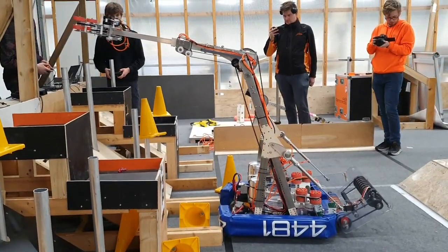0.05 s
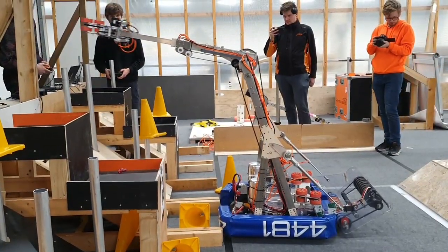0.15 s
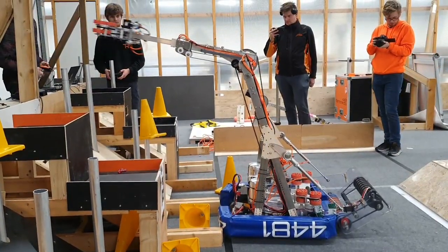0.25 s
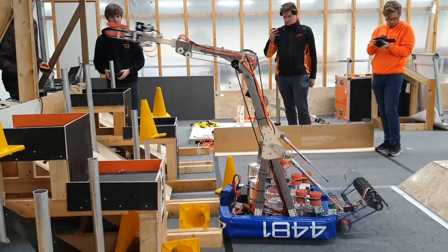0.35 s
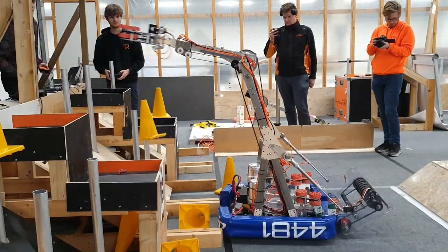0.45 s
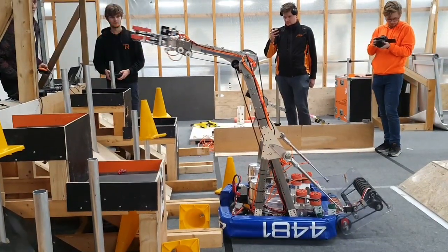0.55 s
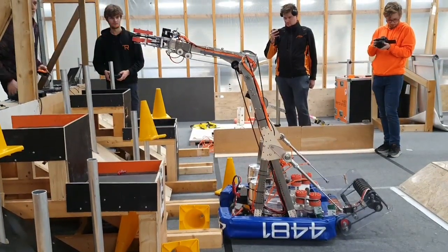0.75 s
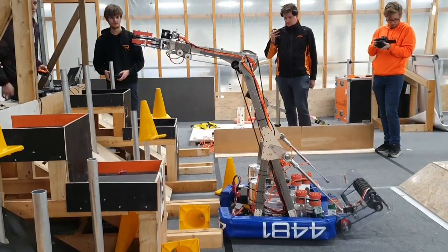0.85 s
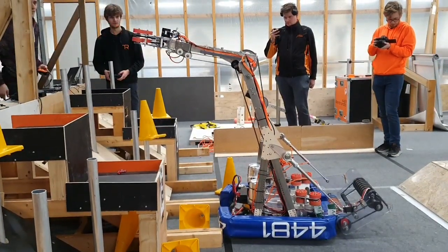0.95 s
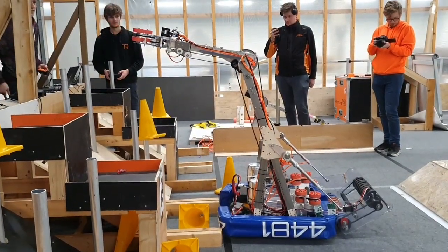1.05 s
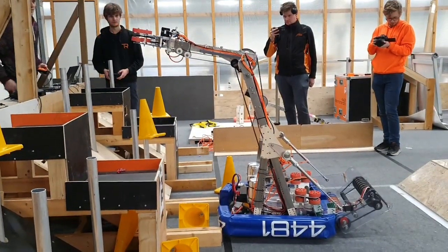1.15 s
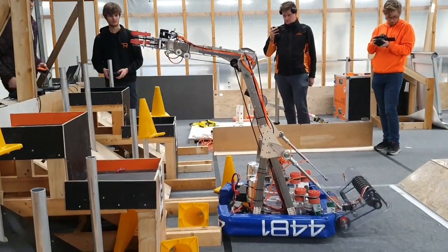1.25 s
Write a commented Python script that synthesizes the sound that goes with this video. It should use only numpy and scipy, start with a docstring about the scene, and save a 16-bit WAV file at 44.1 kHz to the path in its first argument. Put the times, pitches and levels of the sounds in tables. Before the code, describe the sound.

Faint clicks, then a robot arm whirs up, grinding and buzzing for half a second; it hits its stop with a loud clank and thump, rattles a little and rings out in a quiet workshop.

```python
"""Robot arm hitting its stop

A robot arm retracts in a workshop: gear meshing whines, random tooth clashes rattle, the frame drones.
At the end stop, bursts of decaying coloured noise make the clunk and the clicks of loose parts.
Decaying sine modes thump the chassis and ring the metal tubes, and low noise booms after them.
Noise tails convolved with the motor and the hits form the hall, over a low steady background.
"""
import sys
import numpy as np
from scipy import signal
from scipy.fft import rfft, irfft, next_fast_len
from scipy.io import wavfile
from scipy.ndimage import map_coordinates

SR = 44100
rng = np.random.default_rng(int(sys.argv[2]) if len(sys.argv) > 2 else 0)


def store_wav(level_fs):
    """Save 16-bit WAV to argv[1]."""
    pcm = np.round(np.clip(np.atleast_2d(level_fs), -1, 1) * 32767)
    wavfile.write(sys.argv[1], SR, pcm.T.astype(np.int16))


N = 57330


def amp(db):
    """Decibel law: the amplitude gain of a level in dB."""
    return 10 ** (np.asarray(db) / 20)


def unit(x):
    """Normalisation: x scaled to an rms of 1."""
    return x / np.sqrt(np.mean(x ** 2) + 1e-20)


def clock():
    """Sampling: the time of each sample in seconds."""
    return np.arange(N) / SR


def along(points, hz):
    """Interpolation of (Hz, value) points on a logarithmic frequency axis."""
    point_hz, value = np.transpose(points)
    return np.interp(np.log(hz + 1), np.log(point_hz + 1), value)


def curves(rows):
    """Linear interpolation in time: one curve for each column after the seconds."""
    seconds, *columns = np.transpose(rows)
    return [np.interp(clock(), seconds, column) for column in columns]


def wobble(rate):
    """Band-limited fluctuation: a spline through random knots, rate of them a second."""
    return map_coordinates(rng.standard_normal(N), [clock() * rate])


def phase(hz):
    """Phase in radians as the running integral of a frequency."""
    return 2 * np.pi * np.cumsum(hz) / SR


def filtered(x, response):
    """Linear filtering: the spectrum of x times a response of frequency."""
    size = next_fast_len(N + SR // 2)
    spectrum = rfft(x, size) * response(np.fft.rfftfreq(size, 1 / SR))
    return irfft(spectrum, size)[..., :N]


def coloured(x, colour):
    """Spectral shaping: x filtered through (Hz, dB) points, then set to an rms of 1."""
    return unit(filtered(x, lambda hz: amp(along(colour, hz))))


# Likeness of the two sides. Each row: frequency in Hz, left-right correlation from 0 to 1.
LIKENESS = [(100, 0.96), (250, .94), (550, 0.86), (1000, 0.31), (2500, 0.12), (5000, 0.11), (15000, 0.074)]


def stereo_noise():
    """Interaural coherence: white noise, alike on both sides in the bass and less so in the treble."""
    def mid_side_gains(hz):
        angle = np.arccos(np.clip(along(LIKENESS, hz), 0, 1)) / 2
        return np.array([np.cos(angle), np.sin(angle)])

    mid, side = filtered(rng.standard_normal((2, N)), mid_side_gains)
    return np.array([mid + side, mid - side])


def struck(start_s, t60, attack_s):
    """Damped response: a fast rise at start_s, then an exponential fall of 60 dB in t60 seconds."""
    age = np.maximum(clock() - start_s, 0)
    return (1 - np.exp(-age / attack_s)) * np.exp(-np.log(1000) * age / t60)


def with_echoes(x, response, echo_db):
    """Superposition: direct sound plus its convolution with a response, at a near-constant power."""
    echoes = signal.fftconvolve(np.atleast_2d(x), response / np.linalg.norm(response[0]), axes=1)[:, :N]
    return (x + amp(echo_db) * echoes) / np.hypot(1, amp(echo_db))


# Background spectrum. Each row: frequency in Hz, relative level in dB.
BACKGROUND = [(15, -55), (25, -23.5), (167, -15), (196, -19.5), (243, -11), (271, -21.5), (515, -23.5),
              (978, -33.5), (1240, -26), (2240, -29), (2560, -28.5), (2780, -32.5), (15000, -73.5)]
BACKGROUND_DB = -53.5  # rms level


def background():
    """Stationary noise: random sound with a fixed, mostly low spectrum."""
    return amp(BACKGROUND_DB) * coloured(stereo_noise(), BACKGROUND)


# Reverberation of the hall. Each row: frequency in Hz, t60 in seconds.
HALL = [(100, 0.6), (500, 0.83), (2000, 0.81), (4000, 0.58), (8000, 0.38), (15000, 0.26)]
MOTOR_WET_DB, HIT_WET_DB = -4.5, -7.5  # tail gain against the direct sound


def hall(x, wet_db):
    """Reverberation: a noise tail in which each frequency decays at its own speed."""
    hz, t, spectrum = signal.stft(stereo_noise(), SR, nperseg=256)
    decay = np.exp(-np.log(1000) * t / along(HALL, hz)[:, None])
    tail = signal.istft(spectrum * decay, SR, nperseg=256)[1][:, :N]
    return with_echoes(x, tail, wet_db)


EARLY_T60 = 0.058  # seconds


def scattered(x, echo_db):
    """Early reflection: a mono source heard directly and off the nearby floor and benches."""
    return with_echoes(x, stereo_noise() * struck(0, EARLY_T60, 0.0028), echo_db)


# Left-right balance of the robot. Each row: frequency in Hz, left minus right in dB.
LEAN = [(200, 0.5), (700, 0.1), (1400, 2), (3000, 4), (4200, 2), (5700, 8.5), (7900, 20.5), (10800, 4),
        (14000, 0.5)]


def left_of_centre(x):
    """Level-difference panning: the left side is stronger by an amount set at each frequency."""
    def side_gains(hz):
        gains = amp(np.array([[.5], [-.5]]) * along(LEAN, hz))
        return gains / np.sqrt(np.mean(gains ** 2, axis=0))

    return filtered(x, side_gains)


# Drive effort. Each row: time in seconds, relative level in dB.
EFFORT = [(.02, -50), (.05, -45), (.095, -40.5), (.15, -33.5), (.18, -31.5), (.25, -28), (.32, -28),
          (.42, -28), (.5, -27.5), (.58, -27), (.625, -30), (.665, -34)]
START_S, STOP_S = 0.031, .675  # seconds
RUNDOWN_S = 0.074  # time constant in seconds


def rundown():
    """Exponential relaxation: motion dies away after the end stop."""
    return np.exp(-np.maximum(clock() - STOP_S, 0) / RUNDOWN_S)


def effort():
    """Amplitude envelope of the drive: it switches on, works, and dies at the end stop."""
    level_db, = curves(EFFORT)
    return amp(level_db) * (clock() > START_S) * rundown()


# Frame drone. Each row: time in seconds, pitch in Hz, relative level in dB.
DRONE = [(.03, 92.5, -83), (.09, 97.8, -58), (.125, 95.5, -36.5), (.175, 79.3, -64), (.21, 53.7, -35.5),
         (.255, 63.4, -29.5), (.29, 67, -25.5), (.335, 71.2, -46), (.38, 97.5, -30), (.455, 101, -28.5),
         (.51, 97, -34), (.59, 87.6, -70), (.64, 81.4, -30), (.675, 88, -40), (.70, 88, -79.5)]
# Spectrum of the shaking. Each row: frequency in Hz, relative level in dB.
SHAKE = [(20, -36), (45, 2), (65, 9), (105, 0.5), (155, -6), (200, -28), (300, -28), (900, -83.5)]
SHAKE_DB = -10  # relative to the drive effort


def frame():
    """Forced vibration: the moving arm makes the frame drone at a gliding pitch and shake."""
    hz, level_db = curves(DRONE)
    drone = np.sqrt(2) * np.sin(phase(hz)) * amp(level_db + 1.3 * wobble(40)) * rundown()
    shake = coloured(rng.standard_normal(N), SHAKE)
    return drone + amp(SHAKE_DB) * effort() * shake


# Chassis modes. Each row: frequency in Hz, relative level in dB, t60 in seconds.
CHASSIS = [(105.2, -9, 0.24), (96.2, -28.5, 0.81), (163.9, -30.5, 0.68), (239.5, -42.5, .5),
           (309.7, -34, 0.55), (385, -40.5, 0.63)]
# Thumps on the chassis. Each row: start in seconds, strength in dB added to every mode.
THUMPS = [(.670, -7.5), (0.6859, 0.5), (0.7336, -14.5), (.828, -20), (.879, -19), (1.008, -26.5)]
THUMP_ATTACK_S = .003  # rise time constant in seconds
# Floor boom spectrum. Each row: frequency in Hz, relative level in dB.
BOOM = [(20, -26), (45, -1), (80, -0.5), (115, -8.5), (165, -7.5), (200, -13.5), (240, -12), (310, -13),
        (500, -21), (1500, -58)]
BOOM_DB, BOOM_T60 = -25.5, 0.94  # level before the envelope; seconds


def chassis():
    """Modal excitation: the chassis thumps at the stop and as the arm rocks back; the floor booms."""
    modes = 0
    for start_s, strength_db in THUMPS:
        for hz, db, t60 in CHASSIS:
            swing = -np.sin(2 * np.pi * hz * (clock() - start_s))
            modes = modes + amp(strength_db + db) * struck(start_s, t60, THUMP_ATTACK_S) * swing
    boom = struck(STOP_S, BOOM_T60, .01) * coloured(stereo_noise(), BOOM)
    return modes + amp(BOOM_DB) * boom


# Metal tube modes. Each row: frequency in Hz, relative level in dB, t60 in seconds.
TUBES = [(708, -39, 0.27), (1170, -35, 0.25), (1685, -31.5, 0.39), (1870, -38, 0.47), (2476, -32.5, 0.41),
         (2714, -34.5, 0.47), (3897, -33.5, .3), (5640, -48, 0.25), (6700, -46, 0.57), (10460, -42.5, 0.37)]
RING_S = .6805  # start in seconds
RING_WAVER = .4  # random phase swing in radians


def tubes():
    """Free vibration: the stop leaves the metal ringing, with a different phase on each side."""
    side_phase = rng.random((2, 1)) * np.pi / 2
    ring = 0
    for hz, db, t60 in TUBES:
        angle = 2 * np.pi * hz * clock() + side_phase + RING_WAVER * wobble(69)
        ring = ring + amp(db) * struck(RING_S, t60, .002) * np.sin(angle)
    return ring


# Loose-part clicks. Each row: start in seconds, relative level in dB, t60 in seconds, treble edge in Hz.
CLICKS = [(.0235, -42.5, 0.09, 7500), (.0325, -39.5, 0.039, 9500), (.7625, -28, 0.028, 18000),
          (.773, -31.5, 0.079, 13000), (.9035, -36, 0.062, 15000), (.914, -43.5, 0.061, 13000)]
# Click spectrum. Each row: frequency in Hz, relative level in dB.
CLICK_COLOUR = [(100, -23), (500, 1), (2500, 12), (5000, 1), (6700, -3), (9500, -1), (12000, -8),
                (15500, -27)]
# End-stop blows. Each row: start in seconds, relative level in dB, t60 in seconds, treble edge in Hz.
BLOWS = [(.6685, -19.5, 0.063, 14000), (.6715, -15, 0.051, 18000), (.6785, -16.5, 0.068, 18000),
         (.6835, -17, 0.11, 13000), (.738, -29.5, 0.056, 9000), (.773, -27, 0.19, 13000)]
# Blow spectrum. Each row: frequency in Hz, relative level in dB.
BLOW_COLOUR = [(40, -16), (90, -12), (160, 5), (200, 1.5), (240, 6), (330, 10), (470, -6), (720, 2),
               (1200, -1), (1500, -4.5), (1900, 0.5), (2600, -3.5), (3900, -3.5), (5000, -10.5),
               (6700, -9.5), (7800, -16.5), (11000, -20), (15500, -22)]


def contacts(rows, colour):
    """Impact: decaying noise stands for densely packed resonances, cut above a treble edge."""
    hits = 0
    for start_s, db, t60, edge_hz in rows:
        crack = filtered(coloured(stereo_noise(), colour), lambda hz: 1 / np.sqrt(1 + (hz / edge_hz) ** 10))
        hits = hits + amp(db) * struck(start_s, t60, 0.00027) * crack
    return hits


# Housing spectrum. Each row: frequency in Hz, relative level in dB.
HOUSING = [(100, -46), (170, -7), (239, -28), (294, -4), (348, -13), (437, -12), (528, -7.5), (741, -8),
           (1230, -8), (1360, -9), (1490, -5.5), (2020, -8), (2390, -2), (3000, -4.5), (3980, -3),
           (6750, -12), (7710, -19), (9140, -15.5), (15500, -29)]
CLASH_RATE = 1500  # mean clashes a second at top speed
CLASH_SPREAD_DB = 0.5  # standard deviation of clash strength
HISS_SHARE = 0.74  # share of power that is steady noise, before the housing
SLOW_TILT_DB, KNEE_HZ = -20, 2500  # dB an octave above the knee, in the limit of zero speed
RATTLE_DB = 0.5  # relative to the drive effort
PINION_TEETH, SURGE_DB = 14, 1.84  # the rattle swells once per turn of the motor


def rattle(mesh_hz, speed):
    """Shot noise: random tooth clashes and hiss excite the housing, brighter with speed."""
    struck_now = rng.random(N) < CLASH_RATE * speed / SR
    clashes = struck_now * amp(CLASH_SPREAD_DB * rng.standard_normal(N)) * rng.choice([-1, 1], N)
    knocks = unit(scattered(clashes / np.sqrt(speed), echo_db=-1))
    mixed = np.sqrt(1 - HISS_SHARE) * knocks + np.sqrt(HISS_SHARE) * stereo_noise()
    bright = coloured(mixed, HOUSING)
    dull = filtered(bright, lambda hz: amp(SLOW_TILT_DB * np.log2(np.maximum(hz / KNEE_HZ, 1))))
    surge_db = SURGE_DB * np.sin(phase(mesh_hz) / PINION_TEETH) + 0.64 * wobble(71)
    return (speed * bright + (1 - speed) * dull) * amp(RATTLE_DB + surge_db)


# Whine partials. Each row: multiple of the tooth rate, relative level in dB,
# flutter at full speed as a share of the pitch.
WHINE = [(1, -.5, .013), (2, -2.5, .0045), (3, -.5, .0035), (4, -5, .004)]
# Level of the whine. Each row: time in seconds, change of level in dB.
WHINE_LEVEL = [(.05, -2), (.24, -2), (.29, 2), (.33, 1), (.37, -1.5), (.46, .5), (.53, -2), (.6, -1.5),
               (.66, -6)]
# Radiation of tones by the gearbox. Each row: frequency in Hz, gain in dB.
GEARBOX = [(600, -36), (800, -23), (1080, -17), (1250, -16), (1340, -11.5), (1390, -13), (1480, -19),
           (1650, -19), (1900, -11), (2150, -19), (2560, -10), (2720, -11), (2900, -18), (3400, -21),
           (3720, -6), (4020, -7), (4400, -13), (5500, -20)]
FLUTTER_RATE = 220  # random knots a second
WHINE_ECHO_DB = -8  # against the direct sound


def whine(mesh_hz, speed):
    """Harmonic radiation: multiples of the tooth rate sound through the gearbox at a changing level."""
    change_db, = curves(WHINE_LEVEL)
    tones = 0
    for multiple, db, flutter in WHINE:
        hz = multiple * mesh_hz
        level_db = db + change_db + along(GEARBOX, hz) + 2.1 * wobble(34.3)
        fluttering_hz = hz * (1 + flutter / speed * wobble(FLUTTER_RATE))
        tones = tones + amp(level_db) * np.sqrt(2) * np.sin(phase(fluttering_hz))
    return scattered(tones, WHINE_ECHO_DB)


# Gear mesh. Each row: time in seconds, tooth rate in Hz.
MESH = [(0, 590), (.06, 605), (.15, 645), (.195, 820), (.24, 1080), (.275, 1225), (.295, 1250),
        (.315, 1328), (.35, 1358), (.41, 1320), (.45, 1360), (.495, 1405), (.54, 1385), (.58, 1310),
        (.61, 1225), (.665, 1080)]


def gears():
    """Gear meshing: one tooth rate governs both the whine and the rattle of the motor."""
    mesh_hz, = curves(MESH)
    speed = mesh_hz / mesh_hz.max()
    return effort() * (rattle(mesh_hz, speed) + whine(mesh_hz, speed))


def scene():
    """Superposition of sources: the arm works to the left of centre, in a quiet hall."""
    hits = contacts(BLOWS, BLOW_COLOUR) + contacts(CLICKS, CLICK_COLOUR)
    reverberant = hall(gears(), MOTOR_WET_DB) + hall(hits, HIT_WET_DB)
    robot = reverberant + tubes() + frame() + chassis()
    return left_of_centre(robot) + background()


TOP_HZ = 15800


def record(dry):
    """Band limiting: nothing is kept from the top frequency upwards."""
    return filtered(dry, lambda hz: hz < TOP_HZ)


dry = scene()
out = record(dry)
store_wav(out)
```